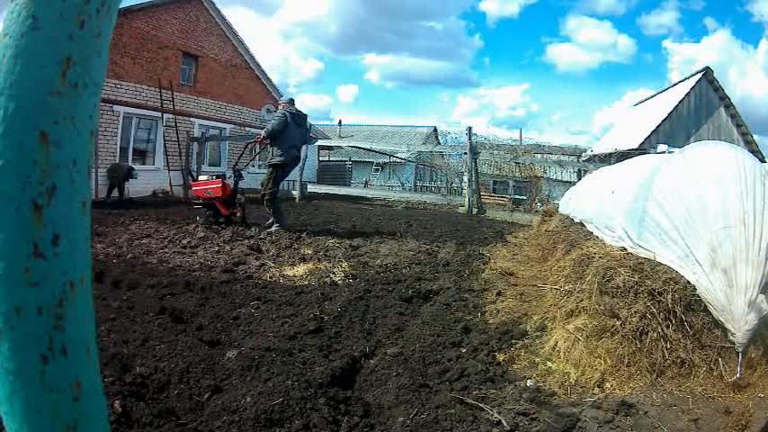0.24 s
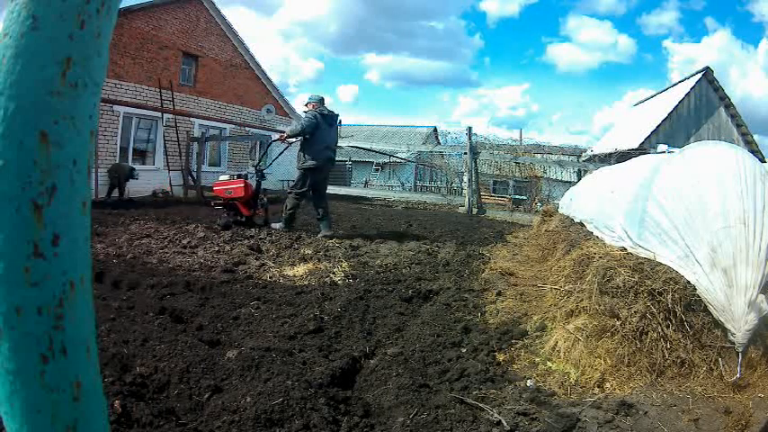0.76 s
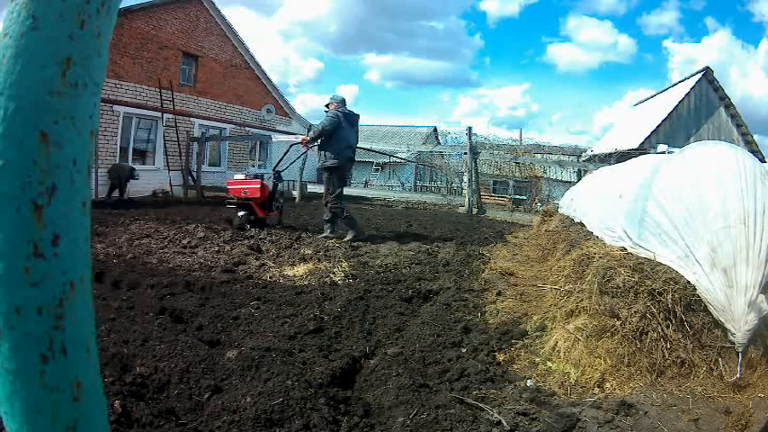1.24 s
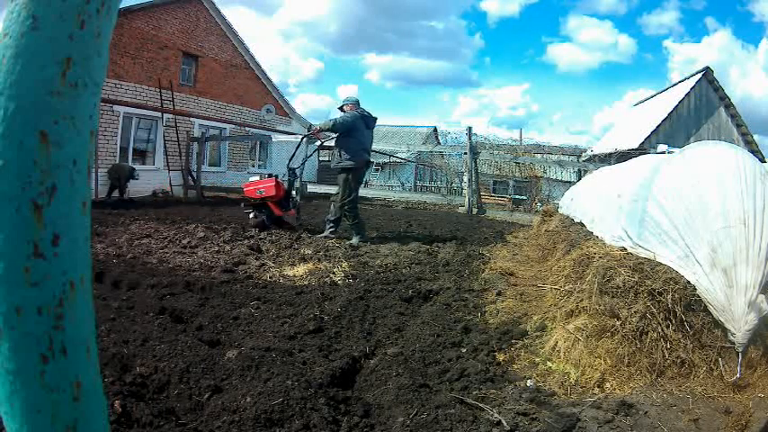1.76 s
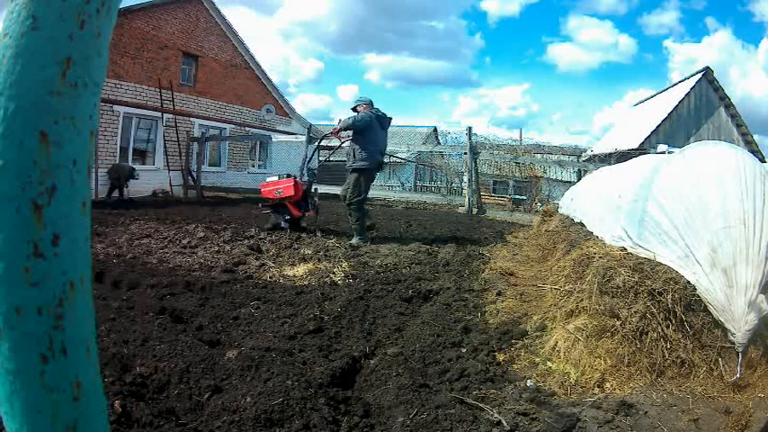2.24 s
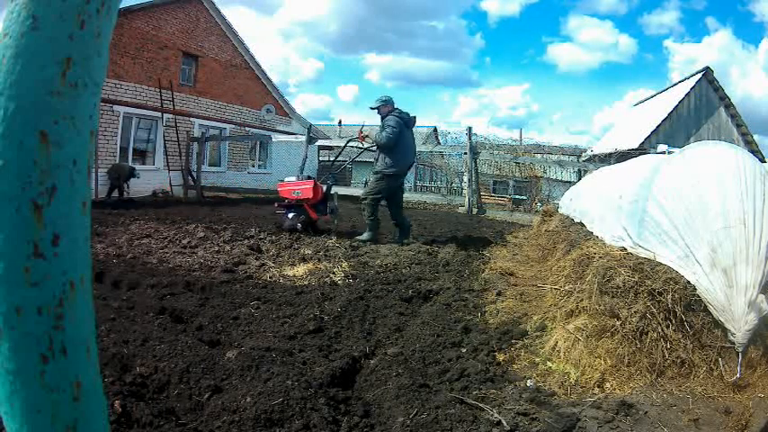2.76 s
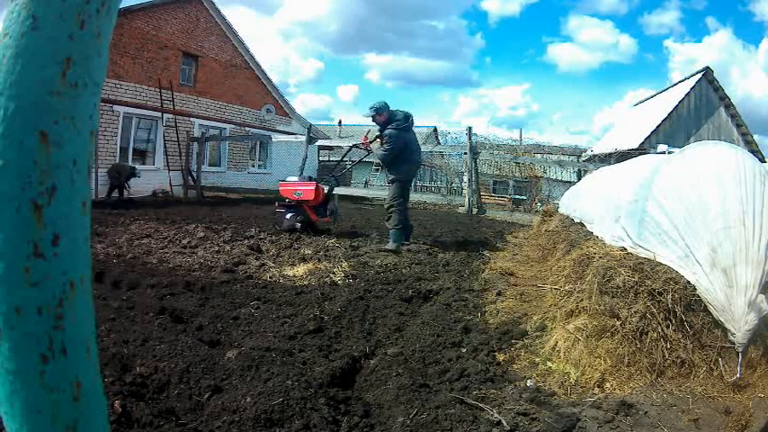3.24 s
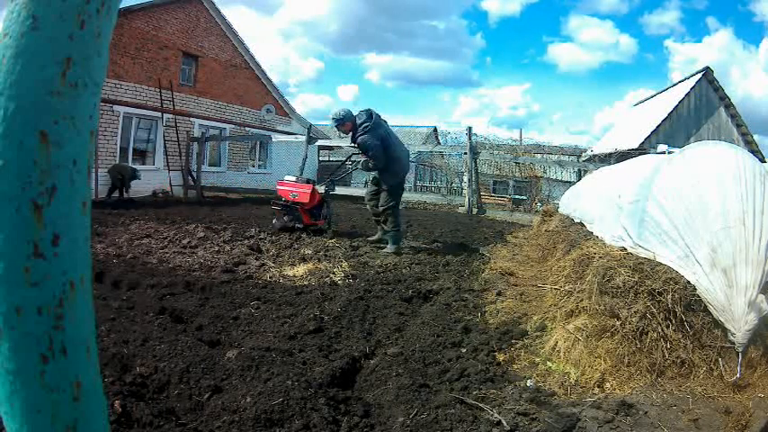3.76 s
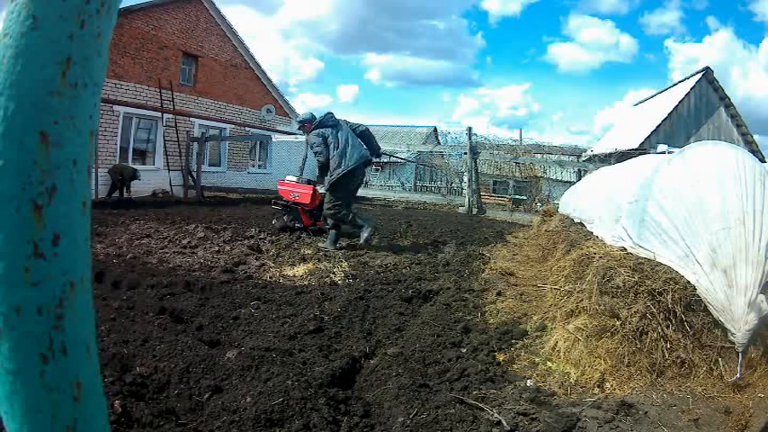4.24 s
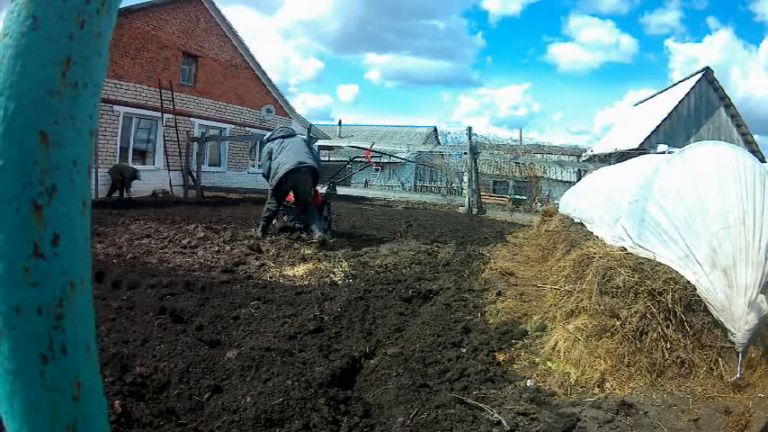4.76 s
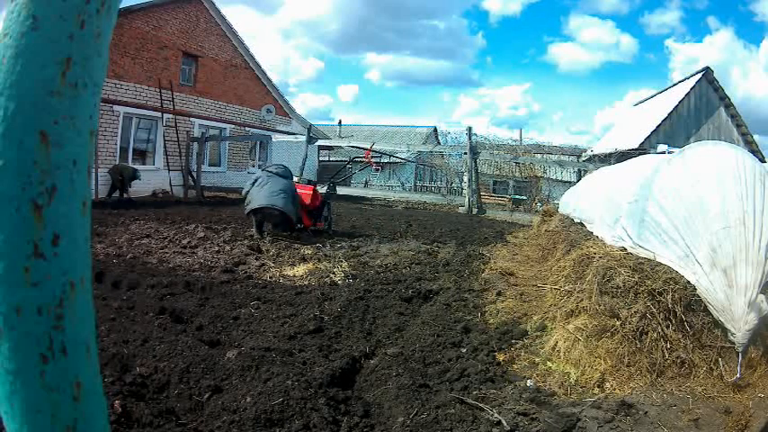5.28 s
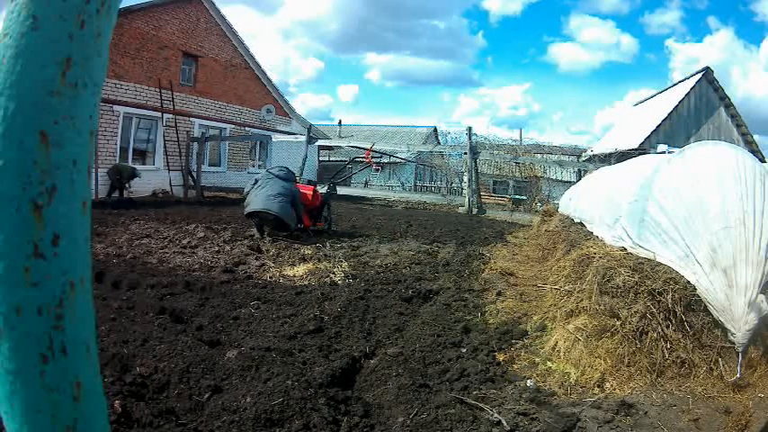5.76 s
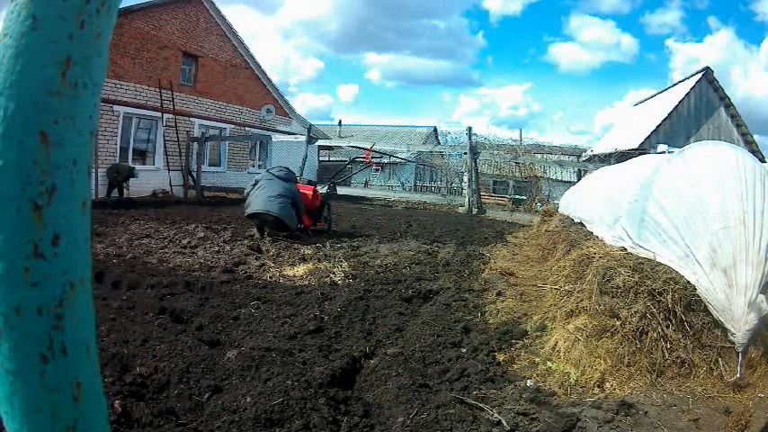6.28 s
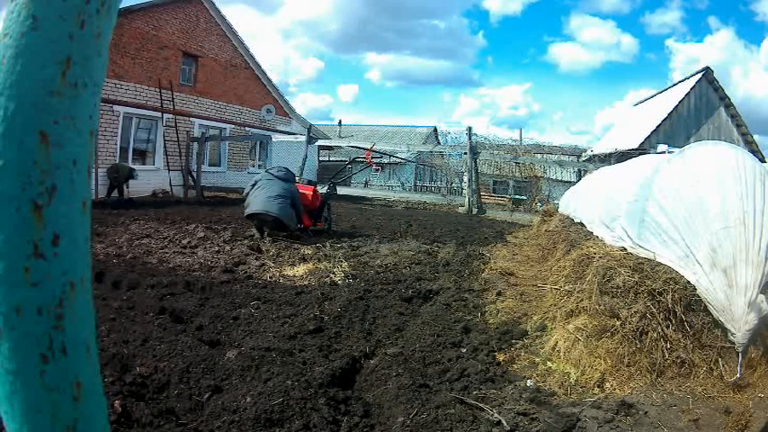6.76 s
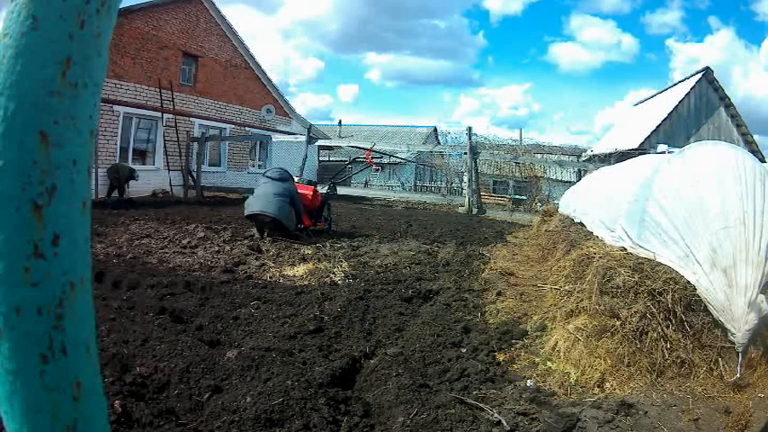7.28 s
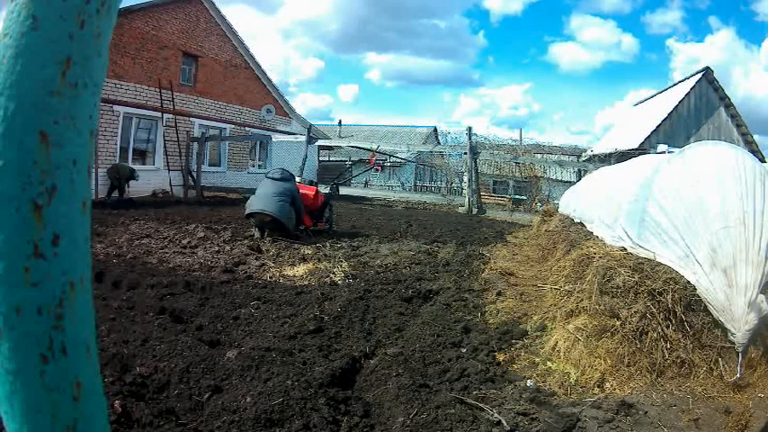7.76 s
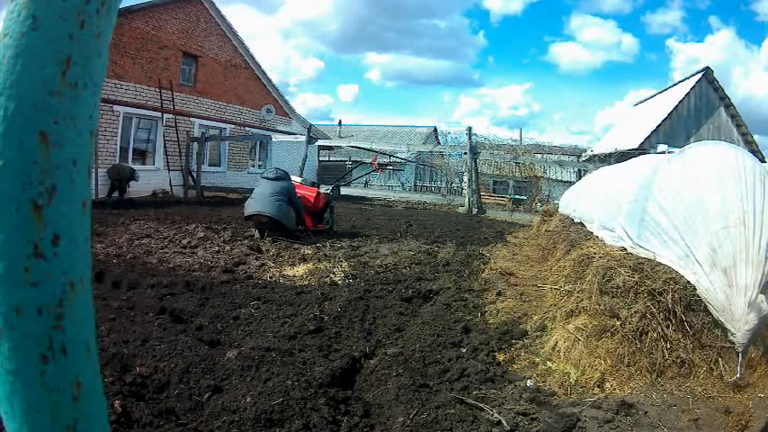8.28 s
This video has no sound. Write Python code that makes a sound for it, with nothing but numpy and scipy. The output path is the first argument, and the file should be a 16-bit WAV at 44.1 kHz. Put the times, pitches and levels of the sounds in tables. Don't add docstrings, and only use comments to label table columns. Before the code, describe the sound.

Outdoors in a garden, a small petrol tiller pops rapidly some metres away. Within a second its tines bite in: the engine sags repeatedly and pops harder, the casing clatters, and soil and stones burst against the metal guard. After three seconds the digging stops and the engine runs steadily and freely. Wind rumbles and shoves the small, lo-fi camera microphone, hardest around four to five seconds.

```python
import sys
import numpy as np
from scipy import signal
from scipy.fft import rfft, irfft, next_fast_len
from scipy.io import wavfile
from scipy.ndimage import uniform_filter1d

SR = 44100
rng = np.random.default_rng(int(sys.argv[2]) if len(sys.argv) > 2 else 0)


def inscribe(sig):
    pcm = np.round(np.clip(np.atleast_2d(sig).T, -1, 1) * 32767)
    wavfile.write(sys.argv[1], SR, pcm.astype(np.int16))


def decibels_to_gain(level_db):
    exponent = np.asarray(level_db, float) / 20
    return 10 ** exponent


N = 375732
T = np.arange(N) / SR
FFT_SIZE = next_fast_len(N + SR)
HZ = np.fft.rfftfreq(FFT_SIZE, 1 / SR)

# start_s, stance (0 far end of the row, 1 digging in, 2 standing free)
STANCE = [(0, 0), (.6, .1), (1.0, 1.), (2.85, 1.), (3.15, 2.), (8.52, 2.)]


def curve(table):
    seconds, values = np.transpose(table)
    return np.interp(T, seconds, values)


def level(x, db):
    return x * decibels_to_gain(db) / np.sqrt(np.mean(x ** 2))


def shape(x, response):
    return irfft(rfft(x, FFT_SIZE) * response, FFT_SIZE)[:N]


def colour(x, table):
    hz, db = np.transpose(table)
    return shape(x, decibels_to_gain(np.interp(np.log(HZ + 1), np.log(hz), db)))


def mode(hz, width_hz):
    return 1j * HZ * width_hz / (hz ** 2 - HZ ** 2 + 1j * HZ * width_hz)


def walk(rate_hz):
    hold = int(SR / rate_hz)
    steps = np.repeat(rng.standard_normal(N // hold + 1), hold)[:N]
    return 1.35 * uniform_filter1d(uniform_filter1d(steps, hold), hold)


def in_stance(number):
    return np.clip(1 - np.abs(curve(STANCE) - number), 0, 1)


def wind():
    # start_s, length_s, level_db
    gust_list = [(.72, .25, -16), (1.4, .5, -23), (2.15, .15, -14.5), (2.37, .3, -19), (2.752, 0.31, -10),
                 (3.15, 0.65, -22), (3.85, .3, -14), (4.143, .3, -10), (4.68, .6, -16), (5.5, 0.2, -19),
                 (5.97, .15, -20.5), (6.5, 0.41, -25), (7.15, .15, -27.5), (7.75, .4, -27.5),
                 (8.38, .1, -27)]
    # pitch_hz, level_db (per Hz)
    wind_colour = [(3, -4.5), (10, -4.5), (25, 0.5), (50, -7), (100, -18), (250, -45.5), (600, -71)]
    # time_s, size (signed, full scale 0.5), width_ms
    shove_list = [(4.185, .25, 8), (4.217, .22, 13), (4.245, -.2, 10), (4.375, -.3, 22), (4.415, .3, 12),
                  (4.9, -.25, 8), (4.92, .55, 11), (4.94, -.4, 9), (4.968, .9, 12), (5.042, .3, 14),
                  (5.1, -.42, 22), (5.118, -.36, 13), (5.16, .36, 17), (5.2, .2, 25)]
    edge_s, breeze_db, rumble_limit = .05, -36.5, .3

    strength = decibels_to_gain(breeze_db)
    for start_s, length_s, db in gust_list:
        rise = np.tanh((T - start_s) / edge_s)
        fall = np.tanh((T - start_s - length_s) / edge_s)
        strength = strength + decibels_to_gain(db) * (rise - fall) / 2
    turbulence = rng.standard_normal(N) * decibels_to_gain(2.5 * walk(11))
    rumble = level(colour(turbulence, wind_colour), 0.42) * strength

    lull = 1 - .7 * np.exp(-T / .1)
    lull = lull - .8 * np.exp(-((T - 5.05) / .2) ** 4) - .6 * np.exp(-((T - 4.3) / .15) ** 4)
    shoves = sum(size * np.exp(-((T - s) * 1000 / ms) ** 4) for s, size, ms in shove_list)
    return rumble_limit * np.tanh(lull * rumble / rumble_limit) + shoves


def guard(x, broad_db=-12):
    # pitch_hz, width_hz, level_db
    guard_modes = [(1043, 70, 5), (1330, 110, -1), (1750, 35, -2.5), (2450, 56, -60.5), (3200, 45, -5.5)]
    ring = 0
    for k, (hz, width_hz, db) in enumerate(guard_modes):
        ring = ring + (-1) ** k * decibels_to_gain(db) * mode(hz, width_hz)
    return shape(x, ring + decibels_to_gain(broad_db) * mode(1490, 3200))


def soil():
    # time_s, peak_db, decay_db_per_s
    spray_list = [(0.0, -25, 122), (0.89, -20, 34), (1.03, -25, 100), (1.14, -21.5, 44), (1.259, -21.5, 37),
                  (1.34, -22.5, 60), (1.52, -14, 153), (1.66, -19, 100), (1.98, -25, 100),
                  (2.048, -13.5, 87), (2.36, -16, 60), (2.43, -22, 90), (2.76, -28.5, 30)]
    rise_s, trickle_db = 0.011, -35.5
    grains = rng.standard_normal(N) * decibels_to_gain(2.5 * walk(250) + 1.0 * walk(40))
    turning = np.clip((3.4 - T) / 0.34, 0, 1)
    thrown = decibels_to_gain(trickle_db)
    for s, db, decay_db in spray_list:
        thrown = thrown + np.clip((T - s) / rise_s, 0, 1) * decibels_to_gain(db - decay_db * np.abs(T - s))
    return level(guard(grains, broad_db=0.5), -2.55) * thrown * turning


def clods():
    # time_s, peak_db, brightness_db
    clod_list = [(0.177, -16, -4), (0.655, -16, -4), (0.907, -5.5, -4), (0.966, -11, -7),
                 (1.029, -11.5, -5), (1.1, -17, -4), (1.139, -10.5, -6), (1.233, -6, -4), (1.294, -4.5, -4),
                 (1.32, -7.5, -4), (1.344, -9, -4), (1.419, -10, -4), (1.489, -10, -4), (1.532, -8, -4),
                 (1.63, -15.5, -4), (1.664, -9.5, -4), (1.686, -8.5, -6), (1.735, -14, -4),
                 (1.913, -16, -4), (1.985, -2.5, -3), (2.014, -8.5, -4), (2.063, -7.5, -4),
                 (2.146, -13, -4), (2.355, -9.5, -4), (2.367, -3, -2), (2.439, -7.5, -4), (2.496, -22, -4),
                 (2.528, -17, -4), (2.772, -12, -4), (2.806, -11.5, -5)]
    clod_db, swell_s = -3, 0.0011
    crack_db, crack_s = 6, .003
    t = np.arange(int(.25 * SR)) / SR
    dull, bright = np.zeros(N), np.zeros(N)
    for s, db, bright_db in clod_list:
        fade_s = np.clip(.14 + .004 * db, .02, .6)
        burst = decibels_to_gain(db + clod_db) * (1 - np.exp(-t / swell_s)) * decibels_to_gain(-60 * t / fade_s)
        i = int(s * SR)
        dull[i:i + len(t)] += burst
        bright[i:i + len(t)] += burst * decibels_to_gain(bright_db) * (1 + decibels_to_gain(crack_db) * np.exp(-t / crack_s))
    grit = rng.standard_normal((2, N)) * decibels_to_gain(3.0 * walk(400))
    thud = level(guard(grit[0]), -4.5)
    hiss = level(shape(grit[1], mode(3500, 2300)), -14.0)
    return dull * thud + bright * hiss


def sag(late_s=0):
    # time_s, sag_hz (firings per second)
    bite_list = [
        (0.266, 0.92),
        (0.639, 1.99),
        (0.946, 2.36),
        (1.138, 1.08),
        (1.351, 2.98),
        (1.603, 2.41),
        (1.777, 0.75),
        (2.047, 2.56),
        (2.404, 2.35),
        (2.733, 1.58),
    ]
    half_length_s = .109
    return sum(depth * np.exp(-((T - s - late_s) / half_length_s) ** 2) for s, depth in bite_list)


def engine_cycle():
    # time_s, speed_hz (firings per second)
    speed_plan = [(0.0, 29.289), (0.3, 29.75), (0.5, 30.309), (1.5, 30.657), (2.95, 29.61), (3.2, 30.716),
                  (3.45, 30.483), (4.8, 30.621), (6.0, 30.758), (7.6, 30.709), (8.52, 30.633)]
    return .872 + np.cumsum(curve(speed_plan) - sag()) / SR


def casing(cycle, throb_db=0.5, flicker_db=0.84, waver_db=3.0):
    # pitch_hz, level_db (per Hz)
    casing_colour = [(150, -21), (230, -4), (330, -9), (480, -9), (650, -13), (850, -10.5), (1300, -7),
                     (1600, -10.5), (1950, -18), (2900, -15.5), (3610, -21.5), (4000, -29), (5200, -80)]
    # time_s, level_db
    clatter = [(0.0, -26), (1.09, -24.5), (2.61, -25), (3.3, -28), (3.75, -28.5), (3.95, -26.5),
               (4.37, -29.5), (4.65, -27.5), (5.0, -32.5), (5.5, -30), (8.52, -30)]
    # pitch_hz, level_db
    rattle_list = [(399, -44), (430, -43), (491, -40), (798, -46), (860, -42), (952, -45), (983, -47),
                   (1013, -43), (1107, -45), (1228, -44), (1323, -47), (1384, -45), (1413, -44),
                   (1590, -49)]
    # time_s, level_db
    settled = [(0, -6), (3, -6), (3.3, -4), (5.1, -4), (5.4, 0), (8.52, 0)]
    free_hz = 30.7

    tones = 0
    for hz, db in rattle_list:
        loudness = decibels_to_gain(db + waver_db * min(hz / 1000, 1) * walk(16))
        turns = round(hz / free_hz) * cycle + hz / 16000 * walk(8) + rng.random()
        tones = tones + loudness * np.sin(2 * np.pi * turns)
    throb = throb_db * np.cos(4 * np.pi * cycle) + flicker_db * walk(14)
    rush = level(colour(rng.standard_normal(N) * decibels_to_gain(throb), casing_colour), 0.22)
    return (rush + decibels_to_gain(31.5 + curve(settled)) * tones) * decibels_to_gain(curve(clatter))


def strain(cycle):
    # multiple (of the firing rate), level_db
    strained = [(12, -41), (14, -41), (15, -41)]
    tones = 0
    for multiple, db in strained:
        tones = tones + decibels_to_gain(db + 3.0 * walk(6)) * np.sin(2 * np.pi * (multiple * cycle + rng.random()))
    return in_stance(1) * tones


def exhaust(cycle):
    # time_s, level_db (from normal)
    engine_level = [(0, -1), (.5, 1.5), (1, 2), (1.5, 1.5), (2, 1.5), (2.5, 2.5), (3, 0), (4, 0), (5, 0.5),
                    (5.5, 1), (8.52, 0.5)]
    # pitch_hz, width_hz
    muffler = [(45, 55), (69, 34), (147, 25), (185, 25), (272, 25)]
    # delay_ms, then the signed push on each of the 5 muffler pitches
    far_pulses = [(-0.47, 1.0, -0.17, 0.89, -0.44, 0.03), (8.57, 0.17, -0.57, 0.35, -0.44, -0.28),
                  (21.35, 1.07, -0.88, -0.3, 0.33, 0.1)]
    loaded_pulses = [(0.1, -0.092, 0.94, 1.21, -0.47, 0.02), (9.015, -0.9, 1.06, 0.63, -0.66, -0.61),
                     (21.5, -0.068, -0.34, -0.49, 0.27, 0.15)]
    free_pulses = [(-0.47, 0.74, -0.29, 0.88, 0.55, 0.7), (8.57, 0.22, -0.89, -0.61, -0.27, -0.41),
                   (21.35, 0.42, -0.24, -0.03, -0.66, -0.81)]
    # pitch_hz, width_hz, depth (0 to 1)
    dips = [
        (115, 30, .1),
        (113, 30, .55),
        (340, 30, .6),
    ]
    pop_hz = 290
    load_db_per_sag, load_lag_s = 0.58, .01

    at = np.flatnonzero(np.diff(np.floor(cycle)))
    uneven_db = 0.81 + 0.6 * sag()[at]
    firings = np.zeros(N)
    firings[at] = decibels_to_gain(uneven_db * rng.standard_normal(len(at)))

    modes = np.array([mode(*m) for m in muffler]) * np.exp(-(HZ / pop_hz) ** 2)
    out = 0
    for number, pulses in enumerate((far_pulses, loaded_pulses, free_pulses)):
        pipe = 0
        for delay_ms, *push in pulses:
            pipe = pipe + np.exp(-2j * np.pi * HZ * delay_ms / 1000) * np.dot(push, modes)
        hz, width_hz, depth = dips[number]
        thinning = 1 - depth * mode(hz, width_hz)
        out = out + shape(firings * in_stance(number), pipe * thinning)
    load_db = load_db_per_sag * (sag(load_lag_s) - sag().mean())
    return decibels_to_gain(40 + curve(engine_level) + load_db) * out


def scene():
    cycle = engine_cycle()
    return (wind() + soil() + clods() + casing(cycle) + strain(cycle) + exhaust(cycle))[None]


def wrap(x, full):
    return (x + full) % (2 * full) - full


def drop_faint(x, frame=1024):
    # low_hz, high_hz, threshold_db, relative (1 if counted from the band's own running level)
    faint_bands = [(3750, 4250, -1, 1), (3450, 4550, -3.3, 1), (11600, 12400, -1.5, 1),
                   (15400, 23000, 0, 0), (14600, 23000, -50, 0), (13750, 23000, -62, 0),
                   (12900, 23000, -72.6, 0)]
    for low_hz, high_hz, db, relative in faint_bands:
        above_low = np.clip((HZ - low_hz) / 100 + .5, 0, 1)
        above_high = np.clip((HZ - high_hz) / 100 + .5, 0, 1)
        band = shape(x, above_low - above_high)
        power = uniform_filter1d(band ** 2, frame)[frame // 2::frame]
        usual = signal.medfilt(power, 9) ** relative
        faint = np.resize(np.repeat(power < usual * decibels_to_gain(2 * db), frame) * 1., N)
        x = x - (1 - .3 * relative) * band * uniform_filter1d(faint, 128)
    return x


def sampler(x):
    tick_times = [
        1.2973,
        1.9884,
        2.0637,
        2.0645,
        2.3682,
        2.3707,
        2.3720,
        2.3722,
    ]
    adc_hz, full = 8000, .5
    smooth = signal.sosfilt(signal.cheby2(10, 24, 4050, fs=SR, output="sos"), x)
    samples = np.interp(np.arange(int(N / SR * adc_hz) + 2) / adc_hz, T, smooth)
    at = (np.array(tick_times) * adc_hz).astype(int)
    samples[at], samples[at + 1] = [.36, -.36] * 4, [-.2, .2] * 4
    samples = samples / (1 + np.abs(samples / full) ** 12) ** (1 / 12) * .998
    steps = np.diff(samples)
    steps[at] = wrap(steps[at], full)
    place = T * adc_hz
    left = place.astype(int)
    return wrap(samples[left] + (place - left) * steps[left], full)


def band_limit(x):
    return signal.sosfilt(signal.butter(12, 15700, fs=SR, output="sos"), x)


def record(dry):
    hiss = decibels_to_gain(-77) * rng.standard_normal(N)
    mix = drop_faint(sampler(dry[0]) + hiss)[None]
    return band_limit(mix)


dry = scene()
out = record(dry)
inscribe(out)
```